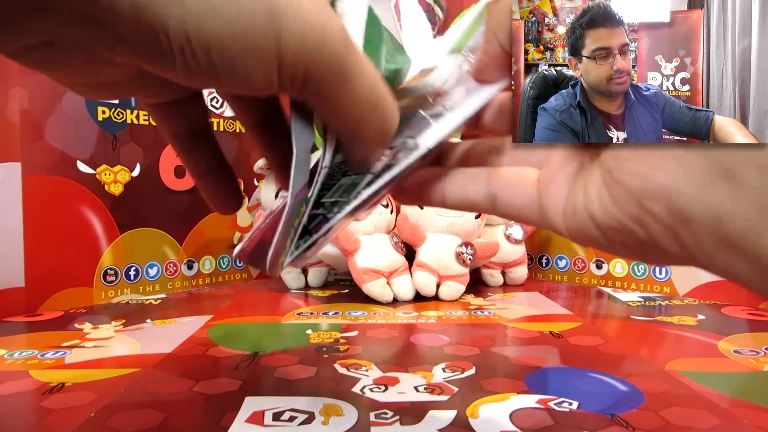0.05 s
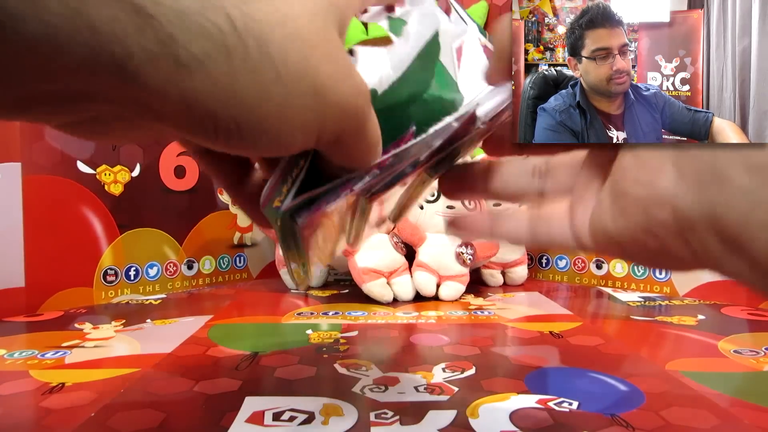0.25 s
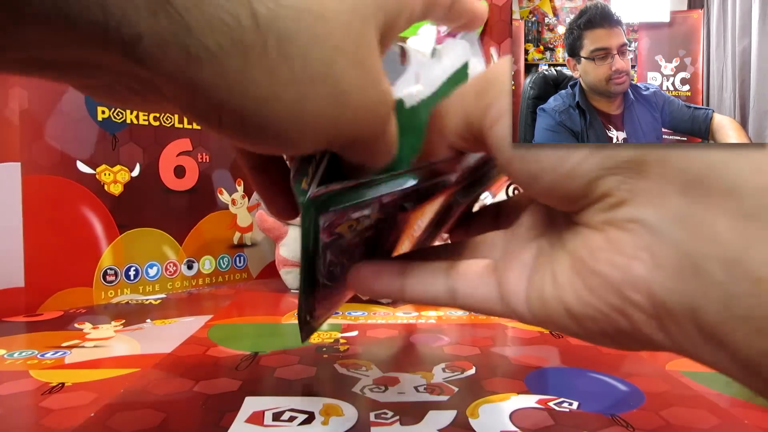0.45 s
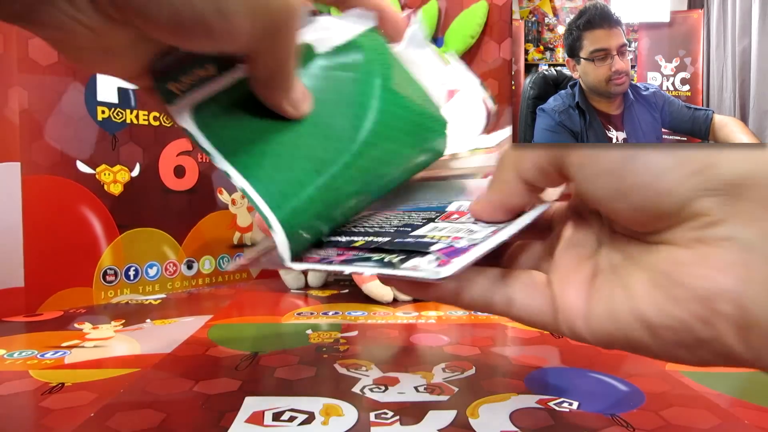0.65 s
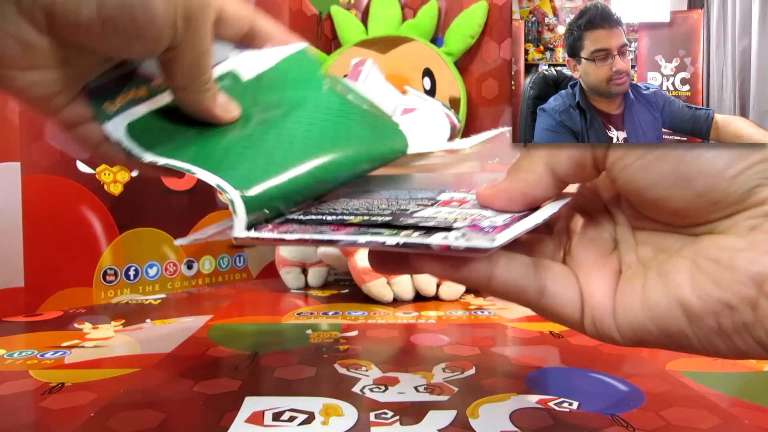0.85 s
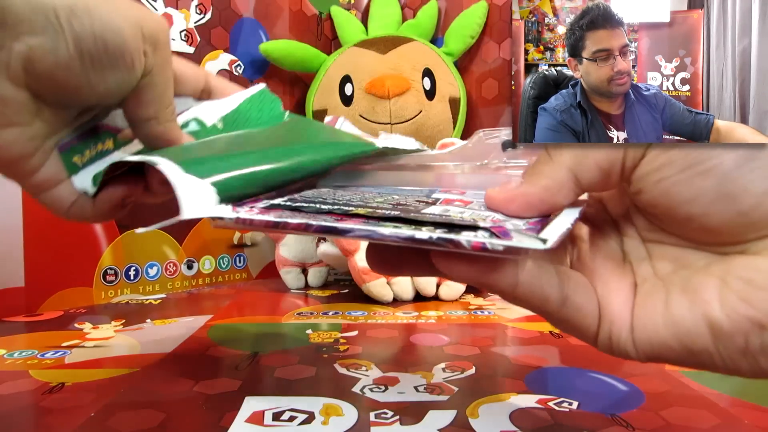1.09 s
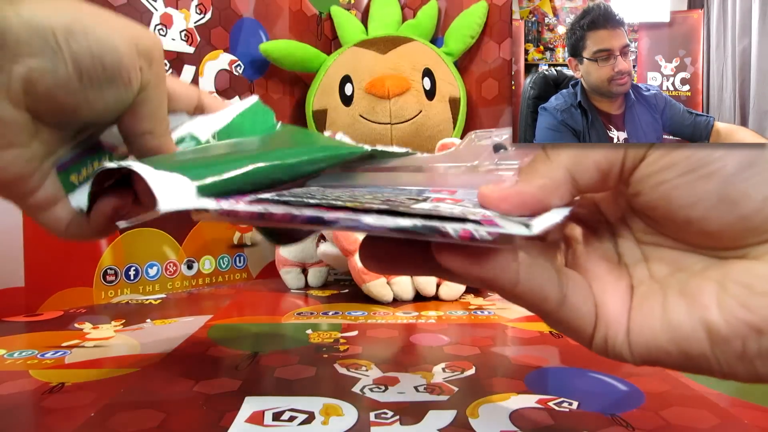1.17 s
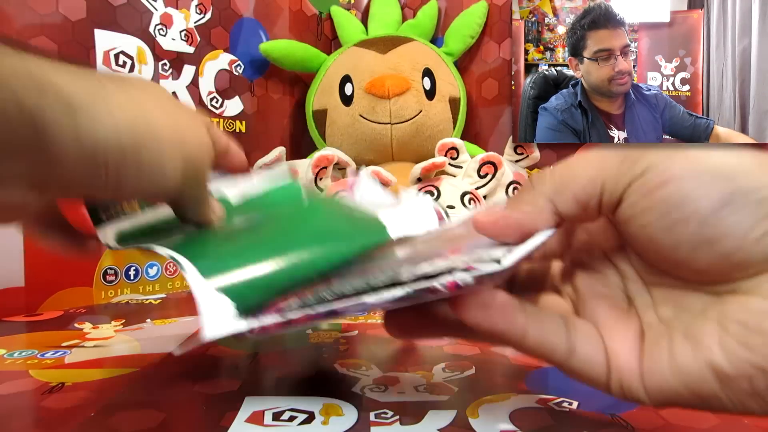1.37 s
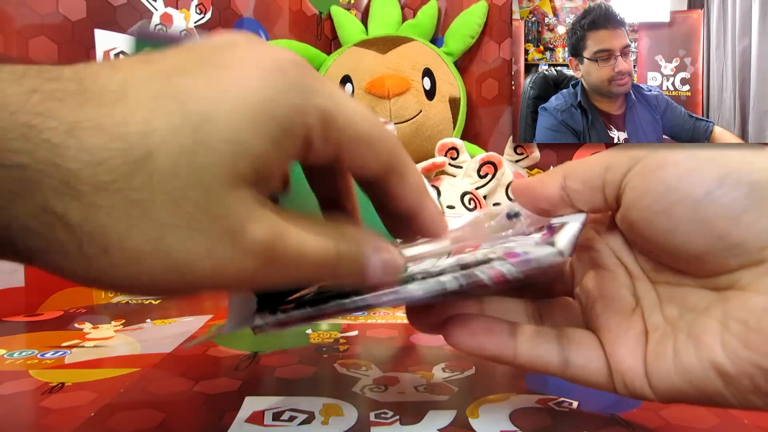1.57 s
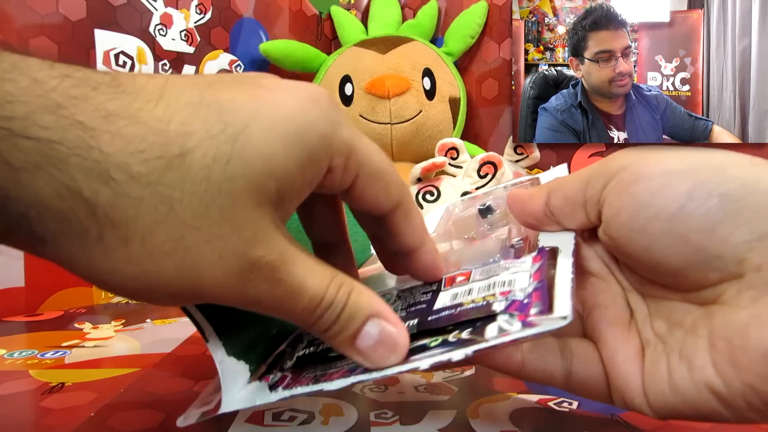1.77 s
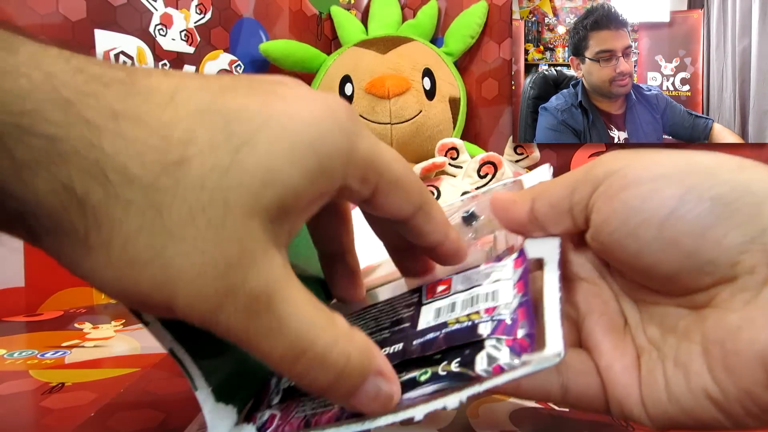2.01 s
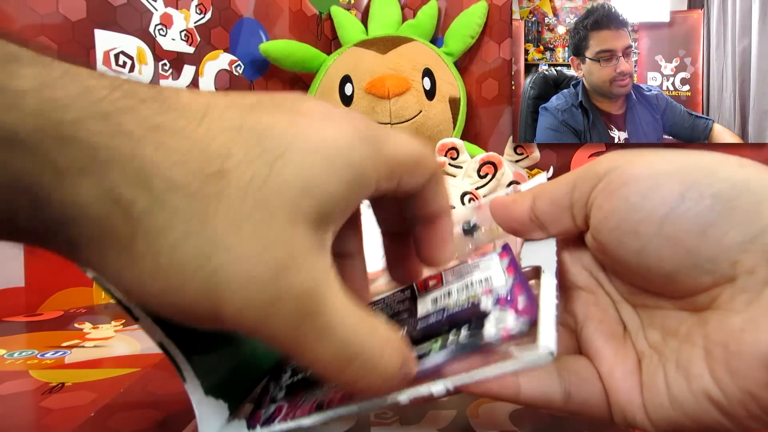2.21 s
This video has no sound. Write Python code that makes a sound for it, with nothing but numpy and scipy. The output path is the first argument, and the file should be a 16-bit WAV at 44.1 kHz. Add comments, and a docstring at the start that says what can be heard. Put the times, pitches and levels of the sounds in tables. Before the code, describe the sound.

A cardboard-backed plastic pack is ripped open nearby, slightly to the right, in a small room. Sharp cracks and crinkles cut through the hiss of tearing card, giving way to a brief swish and softer finger taps.

```python
"""Ripping card and sharp plastic snaps, close by and a little to the right: hands open a blister pack.
The card backing hisses and rustles as its fibres break, and the thin shell cracks and rings as it buckles.
Creases tick and plastic squeaks; then fingers slide over the opened pack and tap it.
A small room answers, with a faint hum."""
import sys
import numpy as np
from scipy import signal
from scipy.fft import rfft, irfft, next_fast_len
from scipy.io import wavfile
from scipy.ndimage import map_coordinates

SR = 44100
rng = np.random.default_rng(int(sys.argv[2]) if len(sys.argv) > 2 else 0)


def store_pcm(level_fs):
    """Save levels as 16-bit WAV."""
    pcm = np.round(np.clip(level_fs, -1, 1) * 32767).astype(np.int16)
    wavfile.write(sys.argv[1], SR, np.atleast_2d(pcm).T)


N = 99225

# The shell buckles: start_s, thud_db, ring_db, pitch_hz, crack_db
SHELL_SNAPS = [(0.2059, -41.5, -29, 1770, -50), (.2378, -25, -13.5, 905, -38), (.2385, -40, -14, 1550, -47),
               (.2535, -32, -17, 878, -33.5), (.259, -46, -21.5, 1300, -32), (0.338, -34, -22, 1980, -34.5),
               (0.4152, -27.5, -21, 1000, -34), (0.4205, -31.5, -21.5, 2270, -30.5),
               (0.5922, -18.5, -6.5, 1254, -15), (.625, -22.5, -12.5, 1290, -19.5),
               (0.634, -29.5, -17, 2030, -26.5), (.639, -35.5, -16, 2000, -24.5),
               (.653, -41, -24, 2260, -32), (0.696, -52, -30.5, 1730, -37), (0.7215, -53, -21.5, 1520, -26)]
# Fingers tap the pack: start_s, thud_db, ring_db, pitch_hz, crack_db
FINGER_TAPS = [(.877, -46.5, -33, 1230, -40), (1.2298, -43, -25.5, 717, -50), (1.2315, -46, -27, 1520, -34),
               (1.358, -47, -42, 1180, -47.5), (1.398, -41, -29.5, 1180, -37),
               (1.603, -40.5, -40.5, 836, -43.5), (1.7041, -55, -32.5, 940, -52),
               (1.7359, -50, -23.5, 1990, -28.5), (1.7375, -39.5, -28, 970, -60),
               (1.857, -53.5, -51, 1060, -50.5), (1.9371, -56, -33, 3000, -42),
               (1.987, -58, -37, 1190, -34.5), (2.044, -49, -42, 1840, -46.5),
               (2.2307, -64, -37, 1025, -51)]
# The notes the shell rings at: pitch_hz, level_db
SHELL_NOTES = [(630, -4), (725, 4.5), (825, 5), (940, 1.5), (1235, 5), (1333, -4), (1590, -8.5), (1995, 4),
               (2175, -2)]
# Tone of the card's thud: frequency_hz, level_db
THUD_TONE = [(175, -25.5), (285, -1), (380, 3), (520, -6), (1500, -33), (16000, -75)]
# Tone of the plastic's crack: frequency_hz, level_db
CRACK_TONE = [(900, -25.5), (2500, -5.5), (6000, 5), (8500, 4.5), (10000, -1), (16000, -1.5)]


def shell_blows(blows):
    """Each snap or tap cracks, rings the shell's notes near its own pitch and thuds the card."""
    out = np.zeros(N + SR)
    t = np.arange(SR // 8) / SR
    note_hz, note_db = np.transpose(SHELL_NOTES)
    scatter_db, detune = 6.5, 0.0093  # the notes vary from blow to blow
    bass_cut = signal.butter(4, 560, 'high', fs=SR, output='sos')
    for start_s, thud_db, ring_db, pitch_hz, crack_db in blows:
        near_pitch = band(pitch_hz, octaves=0.78)
        size, tuning, phase = rng.standard_normal((3, len(SHELL_NOTES), 1))
        thud_noise, flutter_noise, crack_noise = rng.standard_normal((3, len(t)))
        tuned_hz = note_hz[:, None] * (1 + detune * tuning)
        waves = amp(scatter_db * size) * np.sin(2 * np.pi * (tuned_hz * t + phase))
        notes = burst((amp(note_db) * near_pitch(note_hz)) @ waves, fade_s=0.034)
        # The bending patch adds its own note; many brief ones flutter between the main notes.
        patch = burst(np.sin(2 * np.pi * pitch_hz * t), fade_s=17.6 / pitch_hz)
        flutter = amp(1) * burst(filtered(flutter_noise, near_pitch), fade_s=0.049)
        ring = fix_energy(signal.sosfilt(bass_cut, notes + patch + flutter))
        thud = burst(coloured(thud_noise, THUD_TONE), fade_s=0.049)
        db_per_octave = 0.24 * crack_db  # weaker cracks are duller
        dulled = filtered(crack_noise, lambda hz: amp(db_per_octave * np.log2(1 + hz / pitch_hz)))
        crack = burst(coloured(dulled, CRACK_TONE), fade_s=0.015)
        blow = amp(thud_db) * thud + amp(ring_db) * ring + amp(crack_db) * crack
        out[round(start_s * SR):][:len(t)] += blow
    return out[:N]


# The card rips away: time_s, hiss_db, rustle_db
CARD_TEAR = [(0, -47.5, -50.5), (.135, -37, -35.5), (.2, -38.5, -40), (.3, -48.5, -42), (.38, -38, -35),
             (.51, -47.5, -42), (.58, -38.5, -42), (.66, -42, -39), (.77, -40.5, -41.5), (.83, -50.5, -51),
             (.92, -41, -41), (1.03, -40.5, -40.5), (1.1, -46, -39.5), (1.14, -34, -36.5),
             (1.22, -44.5, -42), (1.27, -41.5, -41), (1.33, -63, -54.5)]
# Fingers slide on the pack: time_s, hiss_db, rustle_db
FINGER_SLIDE = [(1.335, -61, -60), (1.4, -40.5, -38), (1.435, -31, -36), (1.465, -46.5, -47.5),
                (1.58, -50.5, -55), (1.73, -46, -43.5), (1.79, -59.5, -58), (1.86, -59.5, -67),
                (1.96, -44.5, -47), (2.02, -53, -52), (2.16, -50.5, -51.5), (2.25, -58.5, -60)]
# Tone of the fibres' hiss: frequency_hz, level_db
HISS_TONE = [(600, -39), (2000, -8), (5200, 0.5), (8200, -4), (16000, -17)]
# Tone of the card's rustle: frequency_hz, level_db
RUSTLE_TONE = [(170, -16.5), (370, -1.5), (550, -9), (740, -1), (2300, -0.5), (3200, -4), (6000, -26.5)]


def friction(stroke, grains_per_s, scatter_db, clump_db, grain_s, steady):
    """Tiny breaks and slips (grains) hiss in clumps and shake the card; returns centre and side sound."""
    time_s, hiss_db, rustle_db = np.transpose(stroke)
    t = np.arange(N) / SR
    grain_db = scatter_db * np.minimum(rng.standard_normal(N), 2)
    grain_db += clump_db * np.tanh(wobble(per_s=61))
    grains = (rng.random(N) < grains_per_s / SR) * amp(grain_db)
    grains += (rng.random(N) < 77 / SR) * amp(11.5)  # about 77 bigger ones a second
    power = signal.lfilter([1], [1, -np.exp(-2 / (grain_s * SR))], grains ** 2)
    strength = np.sqrt(power / power.mean() + steady ** 2)
    hiss, wide_hiss, rustle = strength * rng.standard_normal((3, N))
    gain = lambda db: amp(np.interp(t, time_s, db, left=-120, right=-120))
    centre = gain(hiss_db) * coloured(hiss, HISS_TONE) + gain(rustle_db) * coloured(rustle, RUSTLE_TONE)
    side = gain(hiss_db - 13) * coloured(wide_hiss, HISS_TONE)  # a broad surface sounds wide
    return np.array([centre, side])


# Small creases flick over: start_s, level_db, pitch_hz
CREASE_TICKS = [(.1318, -33.5, 7080), (.323, -38, 1950), (0.4606, -21, 5910), (.5447, -31.5, 5800),
                (0.554, -33.5, 6000), (0.7286, -36, 8550), (1.02, -32, 6970), (1.263, -36.5, 5470),
                (2.061, -40, 4170)]


def crease_ticks():
    """A crease gives a tiny crack and pings with two notes, the lower one softer."""
    out = np.zeros(N + SR)
    t = np.arange(SR // 10) / SR
    for start_s, level_db, pitch_hz in CREASE_TICKS:
        phase = 2 * np.pi * pitch_hz * t
        ping = burst(np.sin(phase) + amp(-5.5) * np.sin(0.54 * phase), fade_s=0.012)
        noise = filtered(rng.standard_normal(len(t)), band(pitch_hz, octaves=0.77))
        crack = amp(-1) * burst(noise, fade_s=0.015)
        out[round(start_s * SR):][:len(t)] += amp(level_db) * fix_energy(ping + crack)
    return out[:N]


# Plastic skids and squeaks: middle_s, half_length_s, level_db, pitch_hz
PLASTIC_SKIDS = [(0.14, .03, -45, 10900), (1.029, 0.032, -41, 10100), (1.065, 0.02, -39, 5160),
                 (1.14, 0.0091, -44.5, 11000), (1.44, 0.0074, -31.5, 4730)]


def plastic_skids():
    """Plastic rubs on plastic in short uneven swells, each at its own pitch."""
    out = np.zeros(N)
    t = np.arange(N) / SR
    for middle_s, half_length_s, level_db, pitch_hz in PLASTIC_SKIDS:
        gain = amp(level_db + 1.5 * wobble(per_s=61))
        swell = np.exp(-.5 * ((t - middle_s) / half_length_s) ** 2)
        squeak = unit(filtered(rng.standard_normal(N), band(pitch_hz, octaves=0.3)))
        out += gain * swell * squeak
    return out


# Sound scattered sideways: frequency_hz, level_db
SIDE_TONE = [(700, -11), (14000, -8)]
# The left side is quieter: frequency_hz, left_minus_right_db
LEFT_LEVEL = [(220, -10), (700, -6.5), (2500, -2), (14000, -3.5)]
# How far the left wave runs ahead of the right: frequency_hz, lead_radians
LEFT_LEAD = [(0, 0.91), (260, 1.43), (3190, 0), (16300, 0.4)]


def room(pack, wide_hiss):
    """The pack's sound spreads unevenly to left and right and bounces off hands, a wall and the room."""
    fade_s, wall_delay_s, scatter_s = 0.17, 0.0085, 0.0009
    t = np.arange(SR // 2) / SR
    tail = rng.standard_normal((2, len(t))) * amp(-60 * t / fade_s)
    tail *= np.clip(t / wall_delay_s - .5, 0, 1)  # the echoes take a moment to build
    early_s = np.arange(SR // 20) / SR
    early_shape = early_s * np.exp(-early_s / scatter_s)
    scatter = lambda: echoed(pack, rng.standard_normal((1, len(early_s))) * early_shape)[0]
    # The wall's echo is late and dull; hands scatter only the treble.
    wall = filtered(pack, lambda hz: np.exp(-2j * np.pi * hz * wall_delay_s) / (1 + 1j * hz / 4140))
    hands = filtered(scatter(), lambda hz: hz ** 2 / (hz ** 2 + 2000 ** 2))
    centre = pack + amp(-11) * hands + amp(-12.5) * wall
    side = wide_hiss + filtered(scatter(), lambda hz: amp(along(SIDE_TONE, hz)))
    stereo = np.array([centre + side, centre - side]) + amp(-10) * echoed(pack, tail)
    share = np.array([[.5], [-.5]])  # left, right
    balance = lambda hz: amp(along(LEFT_LEVEL, hz) * share)
    lead = lambda hz: np.exp(1j * along(LEFT_LEAD, hz) * share)
    return filtered(stereo, lambda hz: balance(hz) * lead(hz))


# Tone of the room's air: frequency_hz, level_db
AIR_TONE = [(25, -11), (125, 3.5), (200, -6.5), (500, -13), (950, 0), (1500, -7), (16000, -42)]
# A low hum and a thin electrical whine: pitch_hz, level_db
HUM_NOTES = [(125.7, -77.5), (7866, -70)]
# The air and hum come up together: time_s, added_db
BACKGROUND_RISE = [(1.2, -4.5), (1.4, 4.5)]


def background():
    """Soft room air with a slightly wavering hum and whine, louder once the tearing ends."""
    t = np.arange(N) / SR
    hum = sum(amp(db) * np.sqrt(2) * np.sin(2 * np.pi * hz * t + .5 * wobble(per_s=9.9))
              for hz, db in HUM_NOTES)
    noise = rng.standard_normal(N) + rng.standard_normal((2, N))  # partly shared by left and right
    air = amp(-56) * coloured(noise, AIR_TONE)
    rise = amp(np.interp(t, *np.transpose(BACKGROUND_RISE)))
    return rise * (air + hum)


def amp(db):
    """Turn decibels into a gain."""
    return 10 ** (np.asarray(db) / 20)


def unit(x):
    """Scale a sound to an average power of 1."""
    return x / np.sqrt(np.mean(x ** 2) + 1e-20)


def fix_energy(x):
    """Give a short sound the energy of about 6 ms at power 1."""
    return x / np.sqrt(np.sum(x ** 2) / (SR // 170))


def burst(x, fade_s, attack_s=0.00057):
    """Make a sound start quickly, then fall by 60 dB in fade_s."""
    t = np.arange(len(x)) / SR
    return fix_energy(x * amp(-60 * t / fade_s) * (1 - np.exp(-t / attack_s)))


def wobble(per_s):
    """A smooth curve through per_s random points a second."""
    points = rng.standard_normal(int(N * per_s / SR) + 4)
    return map_coordinates(points, [np.arange(N) * per_s / SR])


def along(table, hz):
    """Read between the rows of a frequency table, with octaves evenly spaced."""
    row_hz, values = np.transpose(table)
    return np.interp(np.log(hz + 1), np.log(row_hz + 1), values)


def band(centre_hz, octaves):
    """A bell-shaped gain curve around a pitch."""
    return lambda hz: np.exp(-.5 * (np.log2((hz + 1) / centre_hz) / octaves) ** 2)


def filtered(x, gain_at):
    """Multiply each frequency in a sound by gain_at(hz)."""
    length = x.shape[-1]
    padded = next_fast_len(length + 4096)
    hz = np.fft.rfftfreq(padded, 1 / SR)
    return irfft(rfft(x, padded) * gain_at(hz), padded)[..., :length]


def coloured(x, tone):
    """Shape a sound with a tone table, at power 1."""
    return unit(filtered(x, lambda hz: amp(along(tone, hz))))


def echoed(x, echoes):
    """Play a sound through each row of echoes, scaled to energy 1."""
    echoes = echoes / np.linalg.norm(echoes, axis=1, keepdims=True)
    return signal.fftconvolve(x[None], echoes, axes=1)[:, :N]


def scene():
    """Tearing, sliding, snaps and taps in the room."""
    tear = friction(CARD_TEAR, grains_per_s=2200, scatter_db=1.5, clump_db=8,
                    grain_s=0.00038, steady=0.92)
    slide = friction(FINGER_SLIDE, grains_per_s=3200, scatter_db=0, clump_db=4.5,
                     grain_s=0.00055, steady=0.67)
    rustle, wide_hiss = tear + slide
    clicks = shell_blows(SHELL_SNAPS) + shell_blows(FINGER_TAPS) + crease_ticks()
    return room(clicks + plastic_skids() + rustle, wide_hiss) + background()


def record(dry):
    """Round off the loudest peaks and cut the very highest treble."""
    rounded = dry / (1 + np.abs(dry) ** 8) ** (1 / 8)
    return filtered(rounded, lambda hz: hz < 15900)


dry = scene()
out = record(dry)
store_pcm(out)
```